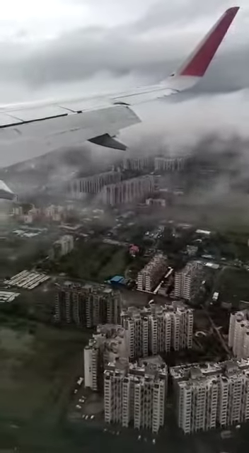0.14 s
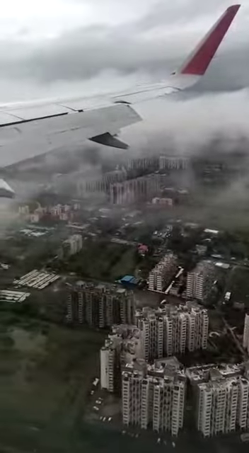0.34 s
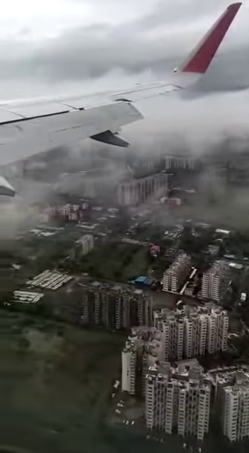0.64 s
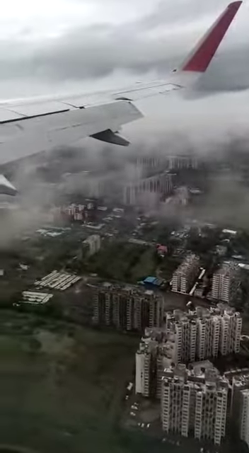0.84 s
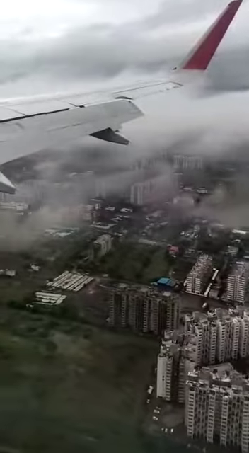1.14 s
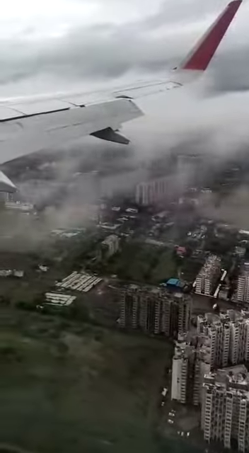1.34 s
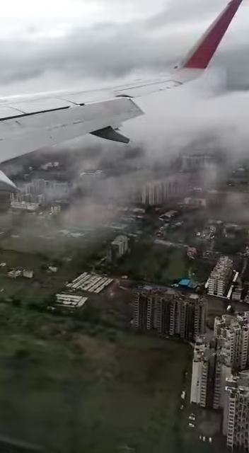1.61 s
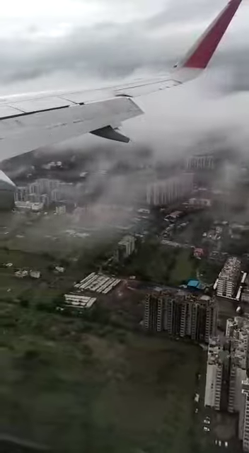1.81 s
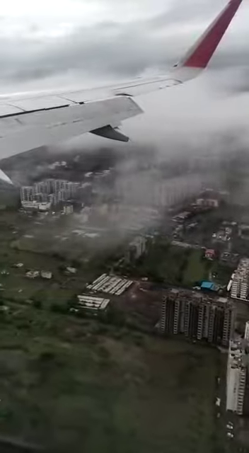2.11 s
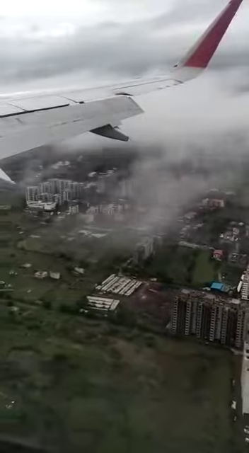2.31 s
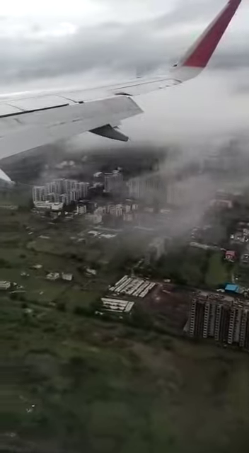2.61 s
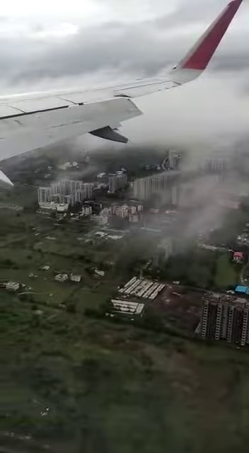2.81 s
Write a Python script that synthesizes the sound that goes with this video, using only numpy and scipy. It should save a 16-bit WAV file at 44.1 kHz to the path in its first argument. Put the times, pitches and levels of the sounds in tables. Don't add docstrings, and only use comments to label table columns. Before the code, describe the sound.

Steady bass-heavy airplane cabin drone heard from a window seat on a handheld stereo phone, slightly wavering, with dull rushing wind, thin airy hiss and a few light cloth rustles, mostly in the first second.

```python
import sys
import numpy as np
from scipy import signal
from scipy.fft import rfft, irfft
from scipy.io import wavfile
from scipy.ndimage import uniform_filter1d, minimum_filter1d

SR = 44100
rng = np.random.default_rng(int(sys.argv[2]) if len(sys.argv) > 2 else 0)


def volts_from_db(level):
    exponent = np.asarray(level, float) / 20
    return 10 ** exponent


def persist_wave(psi):
    counts = np.round(np.clip(psi, -1, 1) * 32767).astype(np.int16)
    wavfile.write(sys.argv[1], SR, np.atleast_2d(counts).T)


N = 130095

# frequency in Hz, density in dB per Hz.
RUMBLE_SPECTRUM = [(6, -15), (19, -8), (26, -11), (42, -4), (55, 0), (68, -5.5), (105, -9.5), (140, -16),
                   (300, -130)]
# frequency in Hz, density in dB per Hz.
ROAR_SPECTRUM = [(82, -69), (140, 0), (181, -1.5), (275, -7), (397, -17), (509, -19.5), (584, -26),
                 (779, -29), (1500, -42), (1950, -57), (3300, -120)]
# frequency in Hz, density in dB per Hz.
HISS_SPECTRUM = [(880, -21.5), (1550, -3.5), (1950, -1.5), (2900, -4.5), (5600, -7.5), (8200, -10.5),
                 (11300, -16.5), (14500, -22.5), (16000, -23)]
# centre in Hz, width in Hz, lift in dB.
RESONANCES = [(770, 150, 2), (1550, 100, -2), (2460, 200, 3), (2720, 250, -2), (3150, 120, -1.5),
              (3850, 200, -2), (4170, 90, 2), (11200, 150, -4), (95, 20, 1), (182, 25, 2), (267, 10, 3.5),
              (143, 12, -3)]
# frequency in Hz, left-right correlation from -1 to 1.
PORT_LIKENESS = [(30, .999), (60, .994), (110, .975), (200, .96), (330, .88), (430, .75), (520, .52),
                 (690, .2), (860, .28), (1030, 0), (1350, -.2), (1550, -.38), (1750, 0), (2600, .14),
                 (3800, -.2), (4200, .15), (5200, .17), (6900, -.15), (9600, -.2), (11000, .1)]
# frequency in Hz, left minus right in dB.
PORT_BALANCE = [(60, .3), (180, 0), (330, -1.5), (550, -3.8), (1200, -.5), (1700, 0)]
# peak time in s, length in s, level in dB, brightest frequency in Hz,
# left minus right in dB.
BRUSHES = [(.208, .02, -42, 5600, 5), (.227, .03, -35.5, 6000, 6), (.236, .025, -38, 7800, 4),
           (.234, .032, -39, 1950, -5), (.236, .025, -40, 4500, -2), (.325, .04, -48, 7500, 0),
           (.476, .024, -39, 6200, 1), (.486, .028, -40.5, 4000, 2), (.531, .006, -42, 7200, 4),
           (.546, .025, -45, 7600, 3), (.592, .012, -43, 7600, 1), (.592, .014, -42.5, 4200, 1),
           (.965, .03, -48, 6500, 3), (1.030, .008, -42, 7500, 3), (1.038, .035, -42.5, 6000, 2),
           (1.106, .009, -39.5, 5600, 1), (1.106, .009, -42, 2200, -1), (1.215, .03, -49, 7500, 0),
           (2.217, .011, -40.5, 8200, -1), (2.25, .04, -53, 9000, -2), (2.73, .02, -50, 9000, -2)]
# centre in Hz, width in Hz, gain in dB.
LEFT_PORT = [(1300, 500, 1.5), (4480, 350, 5.5), (5350, 150, 2.5), (6800, 2200, 3.5), (8700, 1500, 1.5),
             (9900, 600, 2), (13700, 1600, 4), (15500, 900, 6.5)]
# centre in Hz, width in Hz, gain in dB.
RIGHT_PORT = [(1200, 400, 1.5), (4250, 700, 3), (6000, 2400, -4.5), (9400, 1700, 4), (13600, 1600, 1),
              (15700, 300, 4)]
# frequency in Hz, shut share of time (0-1) of the sum, same of
SHUT_SHARES = [(1200, .04, .02), (1550, .2, .02), (1800, .04, .03), (2750, .06, .14), (3150, .13, .07),
               (3500, .06, .09), (3830, .17, .09), (4200, .04, .05), (4900, .04, .12), (7400, .05, .04),
               (8100, .25, .36), (8900, .18, .08), (10000, .27, .18), (11200, .36, .42), (12300, .34, .34),
               (15900, .3, .3)]
# low edge in Hz, high edge in Hz, shut share of time (0-1).
TOP_BANDS = [(14330, 15070, .62), (15070, 15850, .66), (15850, 22050, 1.1)]

RUMBLE_DB, ROAR_DB, HISS_DB = -11, -20, -41
SHAFT_HZ, SHAFT_DB, SHAFT_DRIFT_HZ, SHAFT_WAVER_DB = 34.2, -17.5, .5, 2
BRUSH_OCTAVES, BRUSH_SKIRT_DB, BRUSH_GRAIN_DB, BRUSH_LIKENESS = .52, -8, 3.0, .3
BRUSH_LUMPS_DB, BRUSH_AIR_HZ, BRUSH_AIR_DB = 2.2, 14500, -22
SHUT_DB = -40
TOP_TIRING = .3
LIMIT_DB, LOOK_S, RECOVER_DB_PER_S = -3.0, .003, 120
SPLIT_HZ, TREBLE_DUCK = 250, .2


def engines():
    t = np.arange(N) / SR
    shaft_hz = SHAFT_HZ + SHAFT_DRIFT_HZ * wander(t, 3.11)
    hum = np.sqrt(2) * np.sin(2 * np.pi * np.cumsum(shaft_hz) / SR)
    hum *= volts_from_db(SHAFT_DB + SHAFT_WAVER_DB * wander(t, 2.8))
    rumble = noise(RUMBLE_SPECTRUM, size=16384, patchy_db=1.8, swell_db=1.46, swell_hz=3.1)
    return hum + volts_from_db(RUMBLE_DB) * rumble


def airflow():
    return volts_from_db(ROAR_DB) * noise(ROAR_SPECTRUM, size=4096, patchy_db=0.09, swell_db=-0.2, swell_hz=3.2)


def vents():
    return volts_from_db(HISS_DB) * noise(HISS_SPECTRUM, size=512, patchy_db=0.82, swell_db=0.37, swell_hz=30.0)


def sleeve():
    out = np.zeros((2, N))
    size = 8192
    t, hz = np.arange(size) / SR, np.fft.rfftfreq(size, 1 / SR)
    skirt = volts_from_db(BRUSH_SKIRT_DB) * hz ** 2 / (hz ** 2 + 900. ** 2) / (1 + hz / 6000.)
    air = volts_from_db(BRUSH_AIR_DB) * np.exp(-(np.log2((hz + 1) / BRUSH_AIR_HZ) / .2) ** 2)
    for peak_s, length_s, level_db, top_hz, lean_db in BRUSHES:
        a, b, grain, lumps = rng.standard_normal((4, size))
        pair = np.array([a, BRUSH_LIKENESS * a + np.sqrt(1 - BRUSH_LIKENESS ** 2) * b])
        hump = np.exp(-(np.log2((hz + 1) / top_hz) / BRUSH_OCTAVES) ** 2)
        lumps_db = BRUSH_LUMPS_DB * evened(uniform_filter1d(lumps, size=80))[:len(hz)]
        pair = irfft(rfft(pair) * (hump + skirt + air) * volts_from_db(lumps_db))
        pair *= volts_from_db(BRUSH_GRAIN_DB * evened(uniform_filter1d(grain, size=40)))
        swell = np.exp(-(2.6 * (t - t[size // 2]) / length_s) ** 2)
        pair *= np.linalg.norm(swell) / np.linalg.norm(pair * swell, axis=1, keepdims=True)
        start = round(peak_s * SR) - size // 2
        out[:, start:start + size] += pair * swell * volts_from_db(level_db + np.array([[.5], [-.5]]) * lean_db)
    return out


def noise(spectrum, size, patchy_db, swell_db, swell_hz):
    hop, hz = size // 4, np.fft.rfftfreq(size, 1 / SR)
    frames = N // hop + 5
    a, b, c, d, patches = rng.standard_normal((frames, len(hz), 5)).T
    patches = uniform_filter1d(patches, size=12, axis=0)
    patches = evened(uniform_filter1d(patches, size=8, axis=1))
    likeness = np.clip(read(PORT_LIKENESS, hz), -1, 1)[:, None]
    left = a + 1j * b
    right = likeness * left + np.sqrt(1 - likeness ** 2) * (c + 1j * d)
    lift_db = sum(db / (1 + (2 * (hz - f) / width) ** 2) for f, width, db in RESONANCES)
    swell = wander(np.arange(frames) * hop / SR, swell_hz)
    level_db = (read(spectrum, hz) + lift_db)[:, None] + patchy_db * patches + swell_db * swell
    balance_db = np.array([.5, -.5])[:, None, None] * read(PORT_BALANCE, hz)[:, None]
    z = np.array([left, right]) * volts_from_db(level_db + balance_db)
    return evened(signal.istft(z, nperseg=size, noverlap=size - hop)[1][:, :N])


def wander(t, top_hz):
    rates_hz = np.geomspace(.3, top_hz, num=24)
    return evened(sum(np.sin(2 * np.pi * (f * t + rng.random())) / np.sqrt(f) for f in rates_hz))


def evened(x):
    return x / np.sqrt(np.mean(x ** 2) + 1e-20)


def read(points, hz):
    f, value = np.transpose(points)
    return np.interp(np.log(hz + 1), np.log(f + 1), value)


def ranked(v):
    return v.argsort(-1).argsort(-1) / v.shape[-1]


def scene():
    return engines() + airflow() + vents() + sleeve()


def port_gain(port, hz):
    return volts_from_db(sum(db * np.exp(-(2 * (hz - f) / width) ** 2) for f, width, db in port))


def colour_and_dropouts(x):
    hz, _, z = signal.stft(x, SR, nperseg=2048, noverlap=1536)
    z = z * np.array([port_gain(LEFT_PORT, hz), port_gain(RIGHT_PORT, hz)])[..., None]
    z = np.array([z[0] + z[1], z[0] - z[1]]) / 2
    power = uniform_filter1d(abs(z) ** 2, size=5, axis=2)
    f, *shares = np.transpose(SHUT_SHARES)
    shut_share = np.array([np.interp(hz, f, s, left=0) for s in shares])[..., None]
    shut = ranked(uniform_filter1d(power, size=3, axis=1)) < shut_share
    for low_hz, high_hz, share in TOP_BANDS:
        band = (hz >= low_hz) & (hz <= high_hz)
        whim = uniform_filter1d(rng.standard_normal(z.shape[2]), size=6)
        tiring = np.linspace(0, TOP_TIRING, len(whim))
        strength = ranked(power[:, band].sum((0, 1))) + 2 * ranked(whim) - 2 * tiring
        shut[:, band] |= ranked(strength) < share
    z = z * np.where(shut, volts_from_db(SHUT_DB), 1.)
    z = np.array([z[0] + z[1], z[0] - z[1]])
    return signal.istft(z, SR, nperseg=2048, noverlap=1536)[1][:, :N]


def limiter(x):
    over_db = np.maximum(20 * np.log10(abs(x).max(0) + 1e-9) - LIMIT_DB, 0)
    fall_db, look = np.arange(N) * RECOVER_DB_PER_S / SR, round(LOOK_S * SR)
    held_db = -minimum_filter1d(fall_db - np.maximum.accumulate(over_db + fall_db), 2 * look + 1)
    duck_db = uniform_filter1d(held_db, look + 1)
    treble = signal.sosfiltfilt(signal.butter(2, SPLIT_HZ, "high", fs=SR, output="sos"), x)
    return (x - treble) / volts_from_db(duck_db) + treble / volts_from_db(TREBLE_DUCK * duck_db)


def top_cut(x):
    return signal.sosfilt(signal.butter(12, 15850, fs=SR, output="sos"), x)


def record(dry):
    mix = limiter(colour_and_dropouts(dry))
    return top_cut(mix)


dry = scene()
out = record(dry)
persist_wave(out)
```